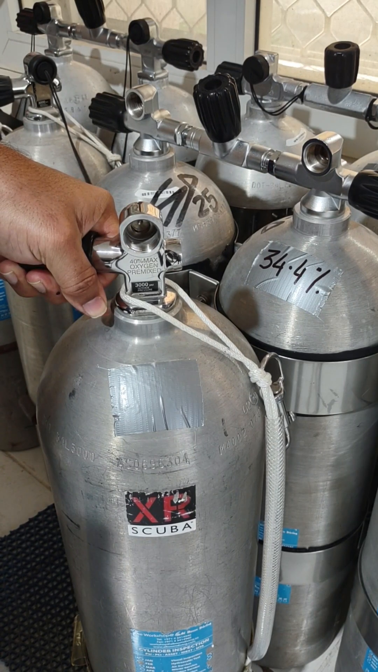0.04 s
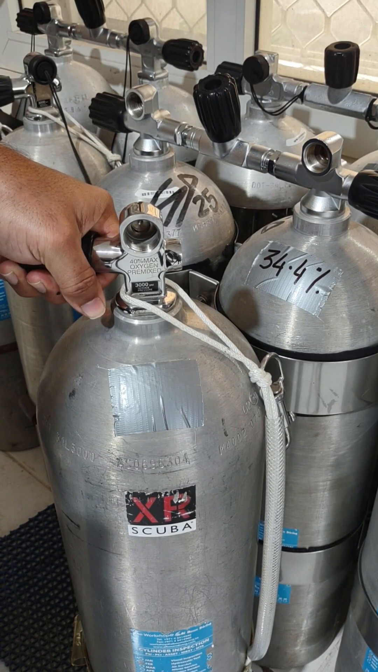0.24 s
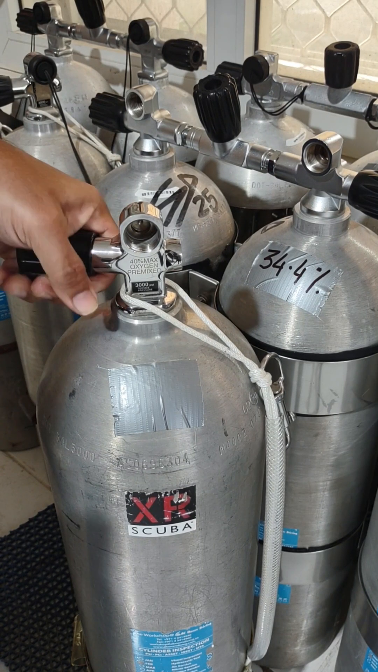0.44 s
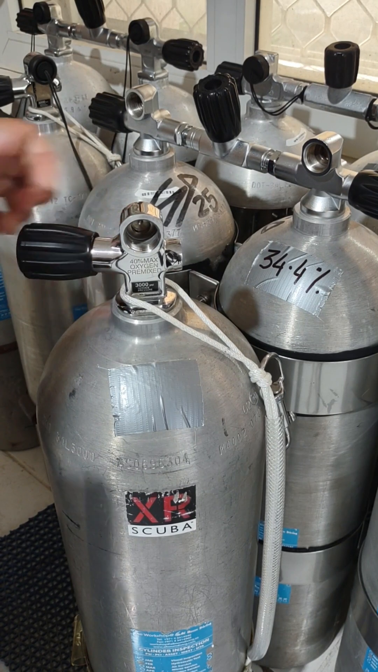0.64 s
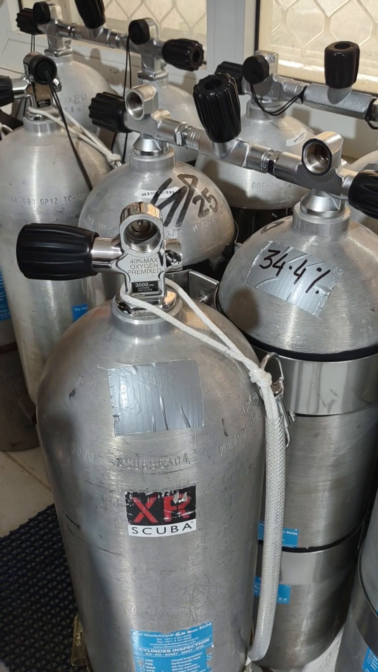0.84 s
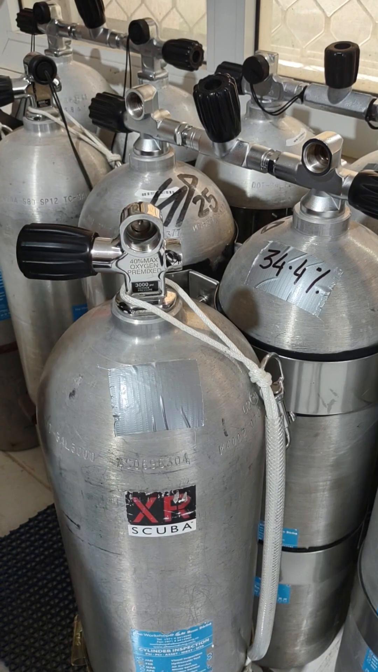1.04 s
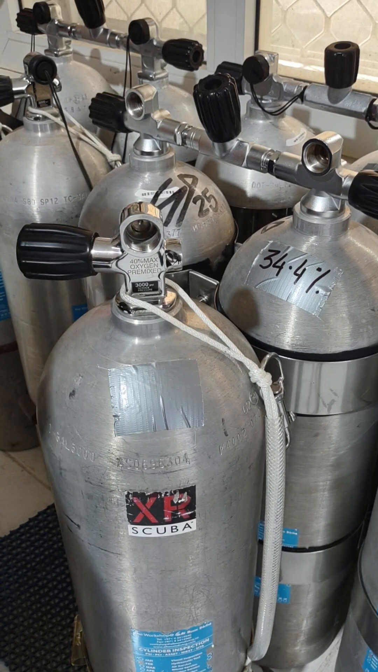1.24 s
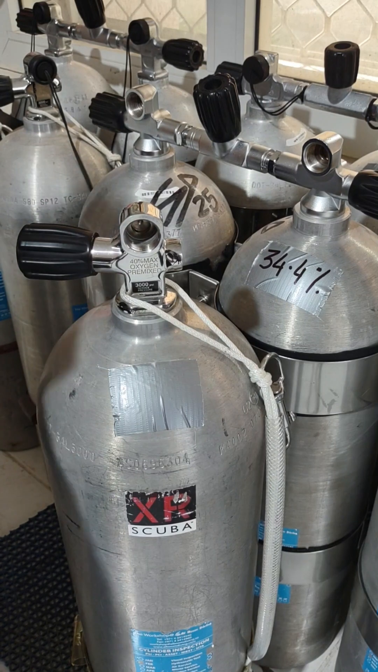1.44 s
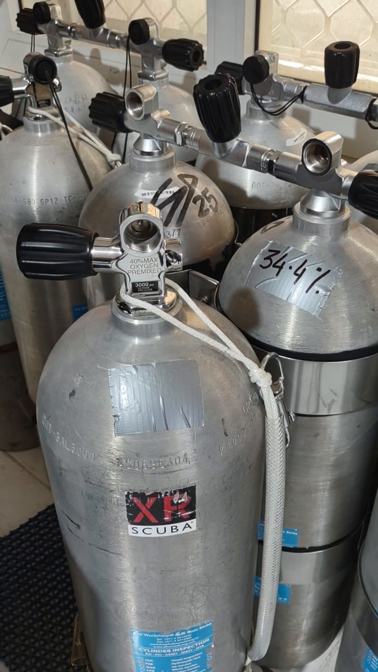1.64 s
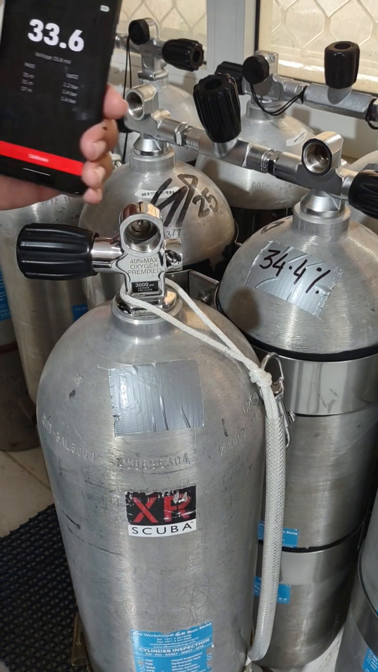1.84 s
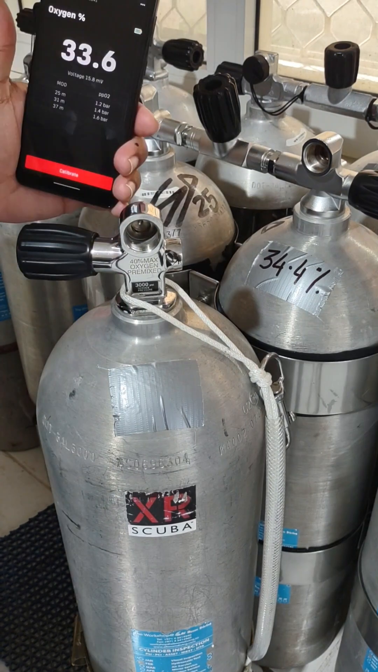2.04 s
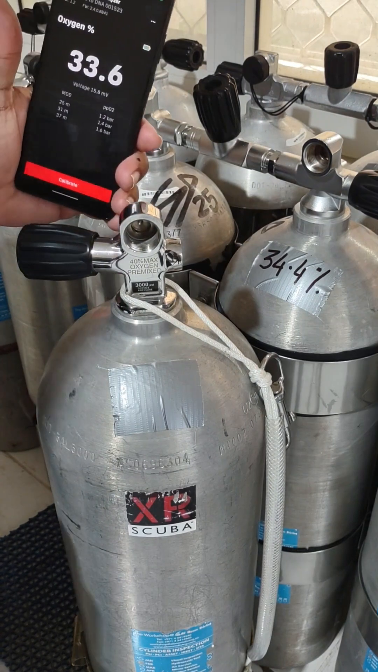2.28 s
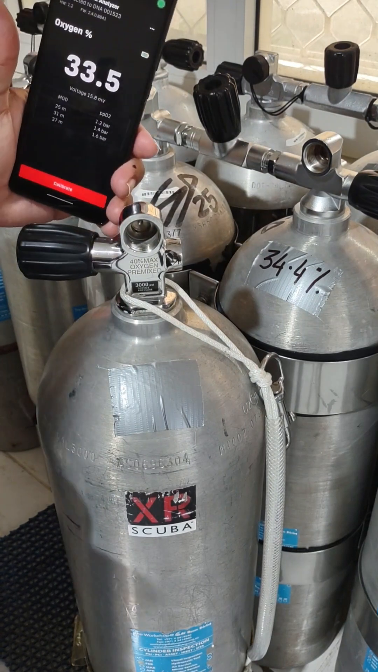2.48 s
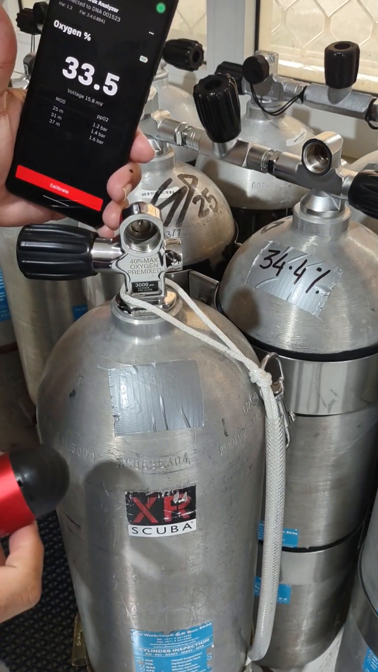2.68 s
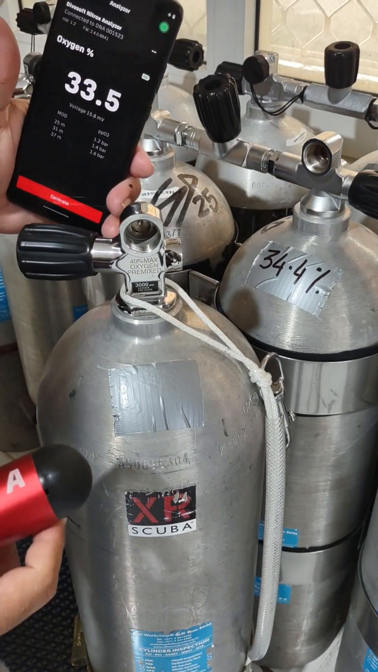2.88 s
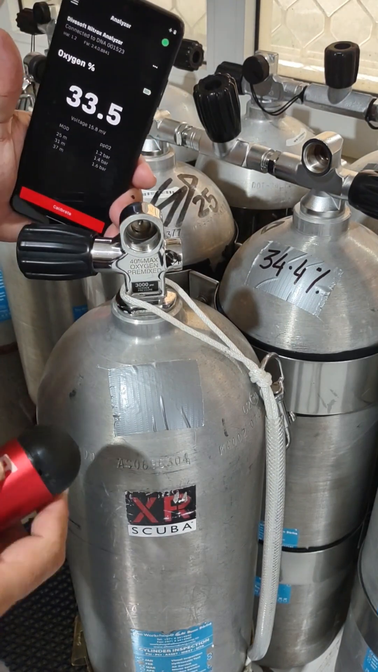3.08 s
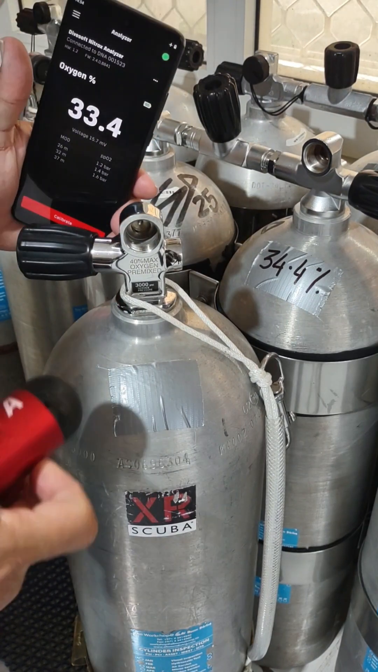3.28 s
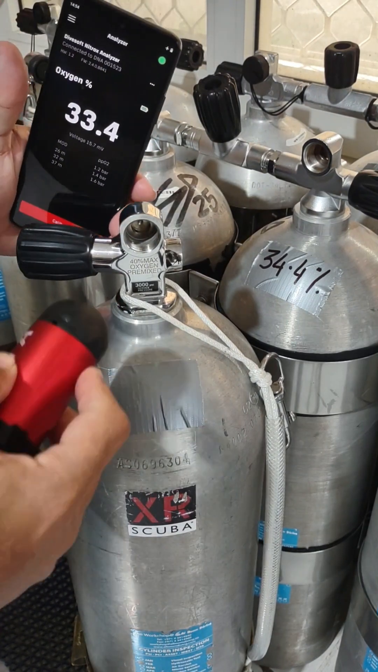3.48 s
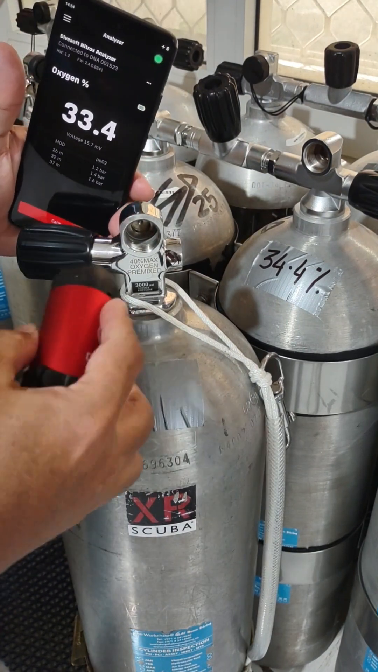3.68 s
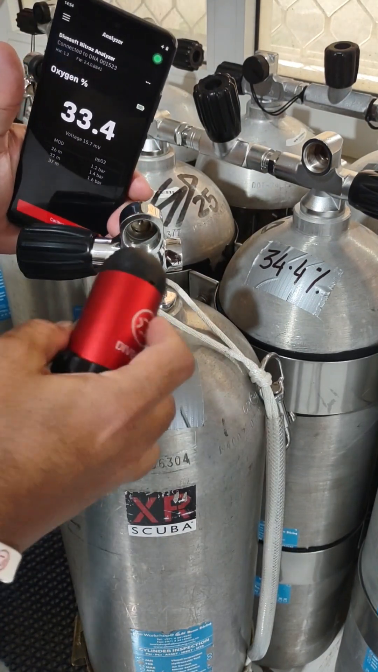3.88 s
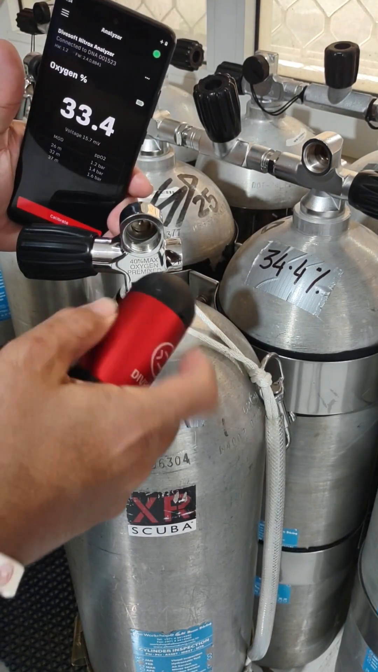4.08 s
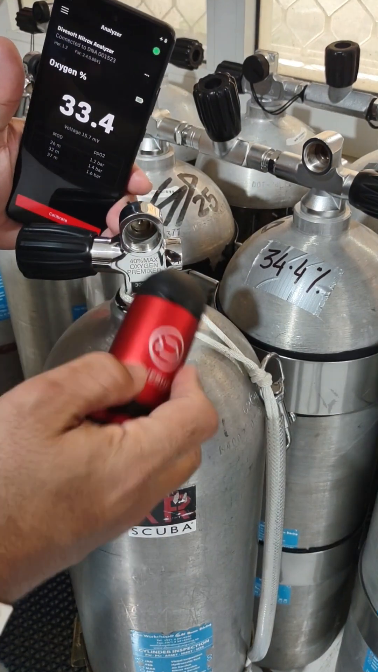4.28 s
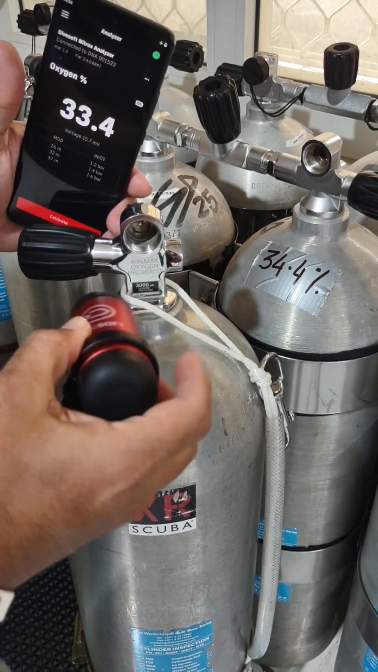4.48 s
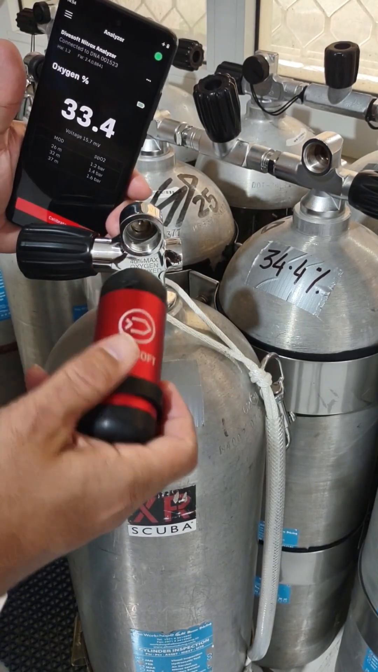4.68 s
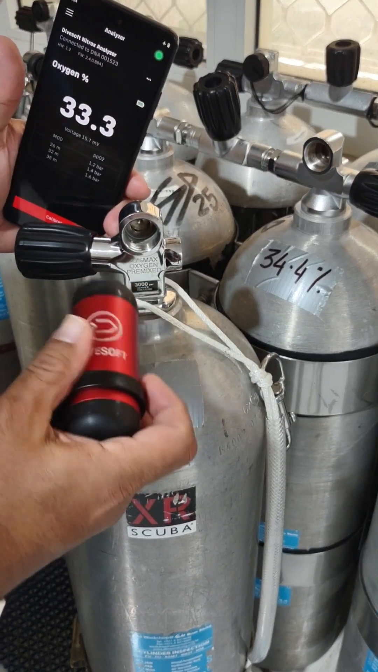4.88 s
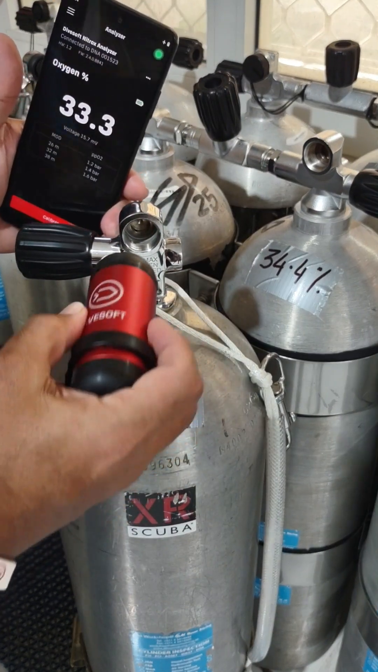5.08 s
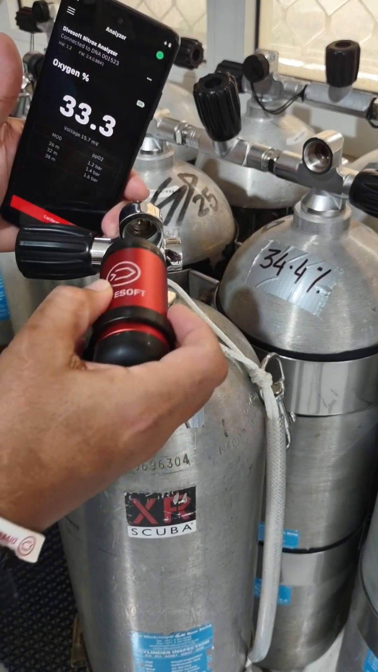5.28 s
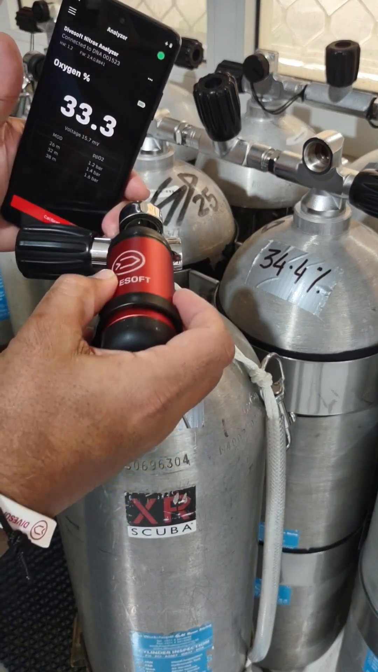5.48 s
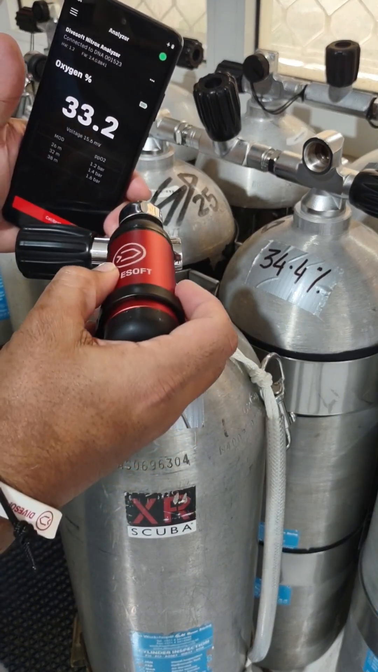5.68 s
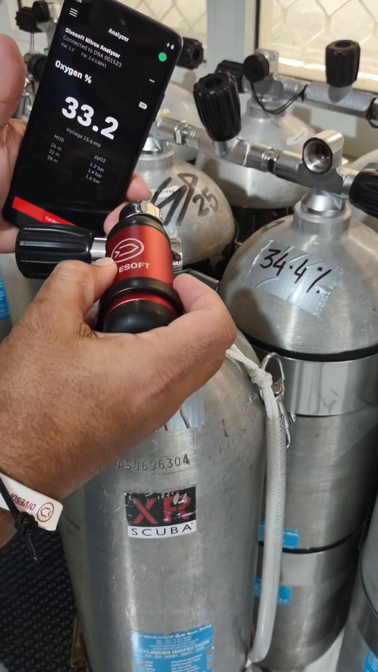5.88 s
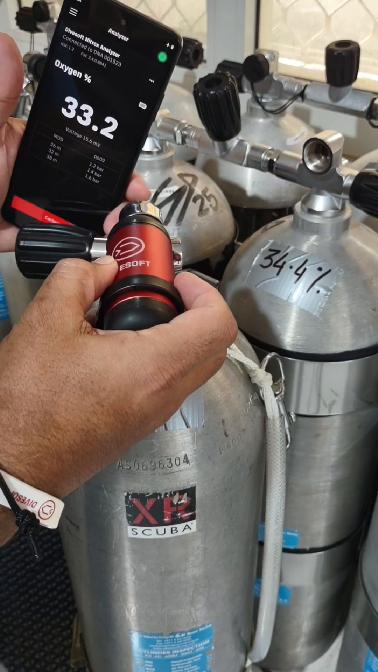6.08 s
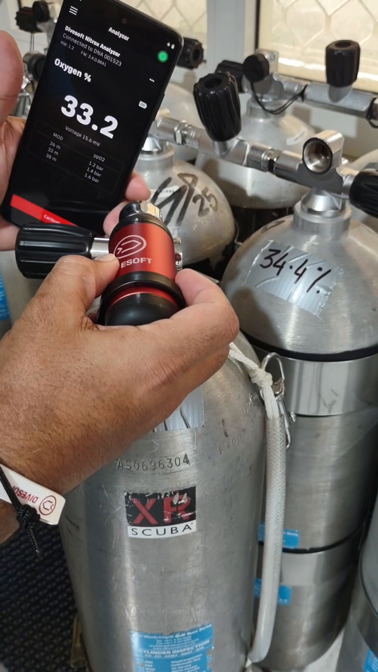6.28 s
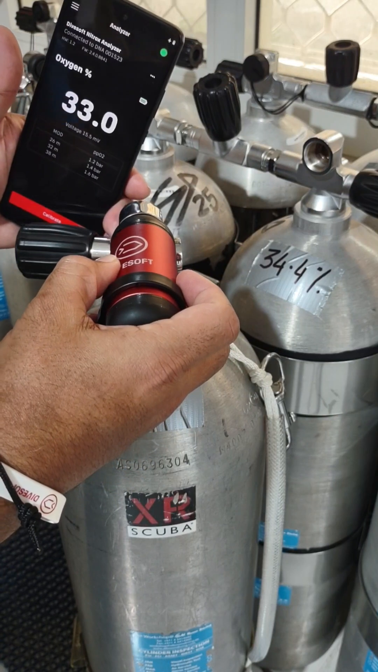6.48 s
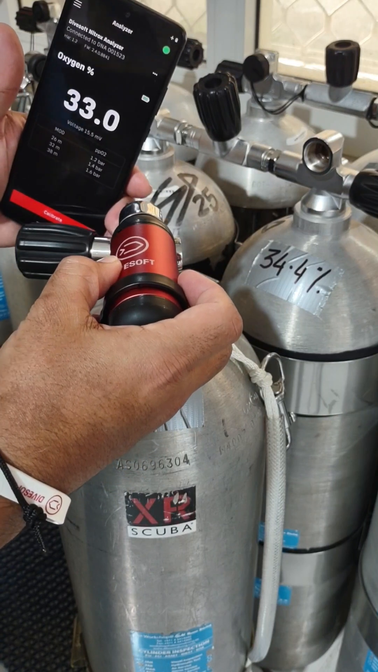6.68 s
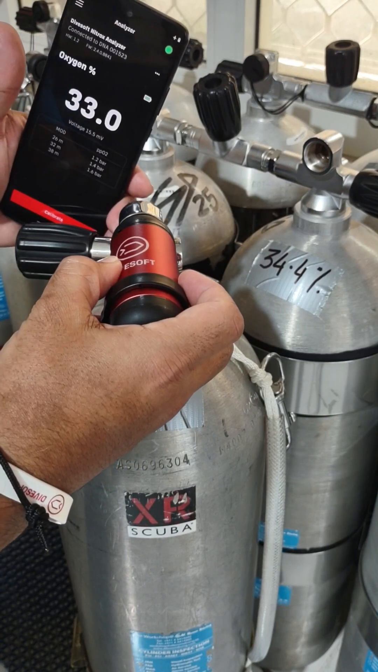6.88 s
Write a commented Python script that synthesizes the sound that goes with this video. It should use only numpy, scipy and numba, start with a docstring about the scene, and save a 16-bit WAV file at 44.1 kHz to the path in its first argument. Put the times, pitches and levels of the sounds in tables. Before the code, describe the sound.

A sharp, airy jet of compressed gas flows for six seconds, darkens and glides downward, then is muffled almost to silence over faint room air.

```python
"""Gas hissing from a cylinder valve, then capped

A jet of gas hisses through a hollow valve mouth: bands of noise, the lowest a gliding resonance of the air.
A hand brings a sensor cap to the mouth: that resonance sinks, the higher bands are shaded, then the cap seals.
Echoes from cylinders, floor and wall ripple the colour. Behind it are dull thuds (dying bursts of low noise),
and a store room's faint air and low hum (steadier noise)."""
import sys
import numpy as np
from scipy import signal
from scipy.fft import rfft, irfft, next_fast_len
from scipy.io import wavfile
from scipy.ndimage import uniform_filter1d
from numba import njit

SR = 44100
rng = np.random.default_rng(int(sys.argv[2]) if len(sys.argv) > 2 else 0)


def to_wav(s):
    """Save 16-bit WAV."""
    ch = np.atleast_2d(s).T  # columns
    pcm = np.round(np.clip(ch, -1, 1) * 32767)  # PCM
    wavfile.write(sys.argv[1], SR, pcm.astype(np.int16))


N = 305610
TIME_S = np.arange(N) / SR

# Colours of the hiss bands above the mouth resonance, and of the low rush, at the two microphone ports.
# Each row: frequency in Hz, left level in dB, right level in dB, extra lead of the right port in radians,
# likeness of the ports (0 to 1). Levels only count against each other. All colour tables work this way.
RUSH_COLOUR = [(538, -6, -14, -.4, 0.54), (755, -11, -12, -1.3, 1), (973, -3.5, 0, -1.5, 1),
               (1320, 8, 0, -0.22, 0.47), (1993, 8, 12.5, -0.92, 0.31), (2560, -25, -11, -.8, 0.42),
               (3200, -36, -29, -0.83, .5)]
SHOULDER_COLOUR = [(3470, -19, -3, 0.14, 1), (3880, -3.5, -11, -0.11, 1), (4180, -1, -10, 0.11, 1),
                   (4610, -5.5, -15, 0.68, 0.27), (4974, -12.5, -16, 1, .6), (5210, -20, -29, 0.58, 0.7),
                   (5700, -39, -39, .9, 0.7)]
MIDDLE_COLOUR = [(5000, -34, -34, 1.0, .95), (5450, -23, -24, .9, .95), (6200, -11, -18, .7, .8),
                 (6600, -4.5, -14, 1.8, .85), (7050, -1.5, -9.5, 3.3, .9), (7700, 0, -15, 4.6, .85),
                 (8000, -6, -18, 5.5, .9), (8400, -22, -30, 6.0, .9)]
DIP_COLOUR = [(7500, -20, -20, 4.3, .85), (7900, -3, -8, 5.2, .9), (8200, 0, -6, 5.8, .9),
              (8600, -2, -6, 6.3, .9), (9100, -4.5, -6, 6.9, .65), (9500, -20, -16, 7.0, .5)]
BRIGHT_COLOUR = [(8700, -36, -28, -2.3, .4), (9200, -19, -19, -2.1, .55), (9500, -6.5, -16.5, -1.6, .9),
                 (9950, 0, -14, -.4, .95), (10300, -3, -15, 1.1, .9), (10550, -7.5, -12, 1.5, .9),
                 (10950, -26, -17, 1.8, .3), (11500, -36, -26, 1.8, .3)]
GAP_COLOUR = [(10600, -22, -14, -1.3, .4), (11050, -4, -1, -1.1, .75), (11600, 0, -1.5, -.5, .85),
              (12400, -1, -4, -.1, .95), (13000, -5.5, -6.5, -.3, .93), (13500, -12, -6, -1.1, .55),
              (14000, -20, -16, -.8, .6)]
TOP_COLOUR = [(12800, -28, -22, -1.0, .5), (13500, -19, -15, -1.0, .55), (13900, -7, -9.5, -.5, .85),
              (14300, 0, -6, .4, .92), (14900, -2.5, -1.5, .7, .95), (15250, -6, -4, .5, .92),
              (15700, -8, -7, -.3, .93), (16200, -9, -8, -.6, .93)]
# Strength of the bands: mouth, rush, shoulder, middle, dip, bright, gap, top.
# Each row: free level in dB, share of the opening, share of the shade, share of the seal, change in dB per second.
BAND_LEVELS = [(-41, 1.27, 0.76, 0.72, -0.29), (-61, 1, 0.27, 0.63, 0), (-44, 1.8, 1, 0.69, 0.5),
               (-38.5, 0.65, 0.93, 0.68, 0), (-48.5, 0.73, 1, 0.93, 0.5), (-35.5, 0.22, 0.87, 1.01, 0.5),
               (-45, 0.55, 0.011, 0.83, -0.28), (-46.5, .3, .1, 0.83, 0)]
# The low rush under the hiss swells and ebbs.
# Each row: time in seconds, change from its free level in dB.
RUSH_SWELL = [(0, 0.5), (1.4, 2), (2.0, -3), (2.6, -2.5), (3.2, 1.5), (3.7, 0.5), (3.95, -3.5), (5.3, -3.5),
              (6.93, -3.5)]
# Hands and sensor moving between valve and microphone shade the hiss.
# Each row: time in seconds, shade in dB (scaled by each band's share).
HAND_SHADE = [(0, -0.5), (.7, -0.5), (.9, -1), (1.2, 0), (1.4, -0.5), (2.4, -0.5), (3.0, -1.5),
              (3.75, -1.5), (3.95, -2.5), (4.1, -2.5), (4.25, -3.5), (4.42, -4), (4.53, -0.5), (4.67, -1.5),
              (4.74, 0), (4.84, -2.5), (4.98, 0), (5.15, -3), (5.4, -4.5)]
# The sensor passes the mouth, then its cap comes down on it.
# Each row: time in seconds, mouth resonance in Hz, leak past the seal in dB (scaled by each band's share).
CAP_PATH = [(0, 3760, 0.5), (2.4, 3754, 0), (3.3, 3690, 0), (3.7, 3600, -0.5), (3.95, 3730, 0),
            (4.4, 3710, 0), (4.95, 3770, -0.5), (5.25, 3760, 0), (5.44, 3530, 0.5), (5.62, 3340, 1),
            (5.81, 3300, 0.5), (5.88, 3110, 2.5), (6.0, 2610, -0.5), (6.28, 2290, 0), (6.46, 2050, -4.5),
            (6.55, 1800, -11.5), (6.585, 1910, -25), (6.65, 2030, -29), (6.93, 2200, -38)]
# What the cap adds to each band (or takes, below zero) as it lowers the resonance.
# Each row: resonance in Hz, then dB for mouth, rush, shoulder, middle, dip, bright, gap and top,
# then dB added on the left and taken from the right.
CAP_EFFECT = [(2020, 2, 13.5, -40, -26, -15, -8.5, -25, -5.5, 0.5),
              (2300, -2, 9.5, -25, -20.5, -11, -8.5, -16, -3, 1.5),
              (2650, -1, 10, -18.5, -17, -8, -4.5, -9, -1, 0.5),
              (3110, 3, 7, -17.5, -7, -10, -6, -7, -4, 1.5),
              (3465, -1, 2, -6.5, 1, -11, -2.5, -2, -3.5, 0.5),
              (3627, 0, -0.5, -0.5, 0, 1, -0.5, 0, 0, 0.5)]
OPENING_S, OPENING_DB = 0.29, -4.5   # time to full flow; shortfall at the start, scaled by each band's share
LEFT_SHADE_SHARE = 0.42              # the shade tilts the image away from the left
MOUTH_WIDTH_HZ, WIDENS_HZ_PER_DB = 516, 38   # shading broadens the resonance
NARROW_BELOW_HZ = 3450               # under the cap the resonance keeps its own width


def jet(flutter_db, own_db):
    """Turbulent gas makes fluttering bands of noise; opening, shade, cap and seal set their levels."""
    opening_db = OPENING_DB * np.clip(1 - TIME_S / OPENING_S, 0, 1)
    shade_db, = in_time(HAND_SHADE)
    centre_hz, seal_db = in_time(CAP_PATH)
    pitch_hz, *columns = np.transpose(CAP_EFFECT)
    *cap_db, tilt_db = [np.interp(centre_hz, pitch_hz, column) for column in columns]
    tilt_db = tilt_db + LEFT_SHADE_SHARE * shade_db

    uncovered = centre_hz > NARROW_BELOW_HZ
    width_hz = MOUTH_WIDTH_HZ - WIDENS_HZ_PER_DB * shade_db * uncovered
    rush = port_noise(RUSH_COLOUR) * from_db(in_time(RUSH_SWELL)[0])
    noises = [mouth(centre_hz, width_hz, skirt_db=-7.5), rush]
    for colour in (SHOULDER_COLOUR, MIDDLE_COLOUR, DIP_COLOUR, BRIGHT_COLOUR, GAP_COLOUR, TOP_COLOUR):
        noises.append(port_noise(colour))

    together_db = flutter_db * drift(42)   # flutter shared by all bands
    hiss = 0
    for noise, effect_db, (free_db, opening, shade, seal, slope) in zip(noises, cap_db, BAND_LEVELS):
        level_db = free_db + slope * TIME_S + effect_db
        level_db = level_db + opening * opening_db + shade * shade_db + seal * seal_db
        own_flutter_db = own_db * drift(19.3)
        hiss = hiss + noise * from_db(level_db + together_db + own_flutter_db)
    return hiss * from_db([tilt_db, -tilt_db])


# Colour of the noise that drives the mouth resonance.
# Each row: frequency in Hz, left dB, right dB, extra lead of the right port in radians, likeness (0 to 1).
MOUTH_COLOUR = [(1210, -15, 4.5, -0.96, 0.6), (2080, 0, -8, -2.35, 0.2), (2930, 9.5, 2.5, -0.26, 0.87),
                (3540, 0.5, -6, -0.66, 0.85), (4040, -3, -24, 0.04, 0.79), (6000, -16, -18, .3, 0.24)]


def mouth(centre_hz, width_hz, skirt_db):
    """The lowest air resonance of the valve mouth: a sharp top on a broad skirt."""
    r = np.exp(-np.pi * np.clip(width_hz, 100, 3000) / SR)   # a wider resonance rings for less time
    bend = 2 * r * np.cos(2 * np.pi * centre_hz / SR)
    once = np.array([gliding(port, r, bend) for port in port_noise(MOUTH_COLOUR)])
    twice = np.array([gliding(port, r, bend) for port in once])
    both = twice + from_db(skirt_db) * once
    power = uniform_filter1d(both.mean(axis=0) ** 2, SR // 4)
    return both / np.sqrt(power)   # the level stays even as the pitch glides


@njit
def gliding(x, r, bend):
    """A resonance whose centre and width change sample by sample; gain 1 on top."""
    y = np.zeros_like(x)
    for i in range(2, len(x)):
        driven = (1 - r[i] ** 2) / 2 * (x[i] - x[i - 2])
        y[i] = driven + bend[i] * y[i - 1] - r[i] ** 2 * y[i - 2]
    return y


def neighbours(x, echo_db, t60, first_s, moved, dull_hz):
    """Echoes from cylinders, floor and wall differ at each port and change as the hand-held microphone wanders."""
    t = np.arange(SR // 12) / SR
    # two sets of echoes for two ports: random taps that die away
    echoes = rng.standard_normal((2, 2, len(t))) * from_db(-60 * t / t60) * (t > first_s)
    echoes *= from_db(echo_db) / np.sqrt(np.sum(echoes ** 2, axis=2, keepdims=True))
    # round metal and rubber mat scatter the treble
    echoes = signal.lfilter(*signal.butter(1, dull_hz, fs=SR), echoes)
    here, there = signal.fftconvolve(x[None], echoes, axes=2)[:, :, :N]
    turn = np.linspace(0, moved, N)   # angle in radians: one set slowly turns into the other
    return x + np.cos(turn) * here + np.sin(turn) * there


# Dull thuds somewhere in the room.
# Each row: start in seconds, body level in dB, level of the knock on top in dB,
# both before the crest allowance is taken off and the impact is added.
THUD_TIMES = [(0.729, -61, -63), (0.839, -65, -67), (0.999, -68, -69), (1.179, -56, -59), (1.449, -70, -59),
              (3.679, -68, -63.5), (3.926, -60.5, -67), (4.229, -62, -70), (5.619, -66, -64),
              (5.975, -66.5, -78), (6.72, -60, -58), (6.849, -75, -64)]
# Colours of the thud's body and of its knock.
# Each row: frequency in Hz, left dB, right dB, extra lead of the right port in radians, likeness (0 to 1).
BODY_COLOUR = [(110, -24, -12, 0, .7), (200, -17, -9, 0, 0.82), (263, 3, -0.5, 0, 0.81),
               (332, -7, -1.5, 0, 0.99), (427, -11.5, -12.5, 0, 0.43), (638, -8.5, -12, 0, 1)]
KNOCK_ON_TOP_COLOUR = [(445, -20, -8, 0, 0.55), (820, 3, 4, 0, 0.7), (990, 0, 1, 0, 0.76),
                       (1300, -13, -12, 0, .6), (2500, -23, -22, 0, .5)]
BODY_T60_S, KNOCK_T60_S = 1.59, 0.97     # time to fall by 60 dB
IMPACT_DB, IMPACT_T60_S = 0.5, 0.095     # short burst added at each start, against the body or knock


def thuds(crest_db):
    """Low noise that sets in at once and dies with the room; crest_db allows for peaks above the rms."""
    body = knock = 0
    for start_s, body_db, knock_db in THUD_TIMES:
        since = (TIME_S - start_s).clip(0)
        started = TIME_S > start_s
        impact = from_db(IMPACT_DB - 60 * since / IMPACT_T60_S)
        body_fade = from_db(-60 * since / BODY_T60_S) + impact
        knock_fade = from_db(-60 * since / KNOCK_T60_S) + impact
        body = body + from_db(body_db - crest_db) * body_fade * started
        knock = knock + from_db(knock_db - crest_db) * knock_fade * started
    return body * port_noise(BODY_COLOUR, lag_s=0) + knock * port_noise(KNOCK_ON_TOP_COLOUR, lag_s=0)


# The level of the room's low hum.
# Each row: time in seconds, level in dB before a slight waver.
HUM_LEVEL = [(0, -81), (1.2, -79.5), (1.9, -83), (3.6, -78), (4.4, -82.5), (5.9, -76), (6.93, -81)]
# Colour of the hum.
# Each row: frequency in Hz, left dB, right dB, extra lead of the right port in radians, likeness (0 to 1).
LOW_HUM_COLOUR = [(20, -22, -17, 0, .9), (45, -5, -15, 0, 0.99), (65, -13, -7.5, 0, 0.69),
                  (80.4, -1, 0, 0, 0.61), (102, -14.5, -10, 0, 0.98), (136.6, -13, -13.5, 0, 0.61)]


def hum():
    """A low hum made of narrow deep noise that swells, ebbs and wavers."""
    level_db = in_time(HUM_LEVEL)[0] + 0.8 * drift(2.5)
    return from_db(level_db) * port_noise(LOW_HUM_COLOUR, lag_s=0)


# Colour of the room's air.
# Each row: frequency in Hz, left dB, right dB, extra lead of the right port in radians, likeness (0 to 1).
ROOM_COLOUR = [(98, -6, -23, 0, 0.45), (140, -7, -7.5, 0, .45), (274, -10, -9.5, 0, 0.47),
               (630, -15.5, -14.5, 0, 0.33), (884, -4, -5.5, 0.0095, 0.88), (2200, -3.5, -13.5, 0, 0.4),
               (4760, -13.5, -15, 0.0043, 0.23), (10100, -17, -26, 0, 0.34), (13300, -34, -28, 0, 0.26),
               (14800, -24, -22, 0, .3), (16000, -20, -18, 0, .3)]


def room_air():
    """The room's air as faint broad noise, nearly steady, around -66.5 dB before the echoes."""
    return from_db(-66.5 + 0.51 * drift(2.6)) * port_noise(ROOM_COLOUR, lag_s=0)


def port_noise(colour, lag_s=7 / SR):
    """Noise as two ports hear it: own colour each, a direct part in common, a diffuse part of their own."""
    size = next_fast_len(N)
    hz = np.arange(1, size // 2 + 2) * SR / size
    table = np.array(colour)
    columns = [np.interp(np.log(hz), np.log(table[:, 0]), column) for column in table.T[1:]]
    left_db, right_db, lead, alike = columns
    alike = np.clip(alike, 0, 1)
    common, own_left, own_right = rfft(rng.standard_normal((3, size)))
    inside = (hz > table[0, 0]) & (hz < table[-1, 0])   # silent outside the table
    # with a lag the left port hears it later: the right port is nearer to the valve
    early = np.exp(1j * (2 * np.pi * hz * lag_s + lead))
    direct, diffuse = np.sqrt(alike), np.sqrt(1 - alike)
    left = from_db(left_db) * (direct * common + diffuse * own_left)
    right = from_db(right_db) * (direct * common * early + diffuse * own_right)
    return rms_one(irfft(np.array([left, right]) * inside, size)[:, :N])


def drift(rate):
    """Slow chance: noise smoothed by two equal low-passes with their corner at rate in Hz; rms 1."""
    r = np.exp(-80 * np.pi * rate / SR)   # one step every 40 samples
    noise = rng.standard_normal(N // 40 + 2002)
    slow = signal.lfilter([1], [1, -2 * r, r * r], noise)[2000:]   # skip the filter's run-in
    return np.interp(np.arange(N) / 40, np.arange(len(slow)), rms_one(slow))


def in_time(rows):
    """Columns of a curve table, drawn with straight lines sample by sample."""
    s, *columns = np.transpose(rows)
    return [np.interp(TIME_S, s, column) for column in columns]


def from_db(db):
    """Decibels to gain."""
    return 10 ** (np.asarray(db) / 20)


def rms_one(x):
    """Scales so that the mean of the channels has rms 1."""
    return x / np.sqrt(np.mean(np.mean(np.atleast_2d(x), axis=0) ** 2))


def scene():
    """Jet, thuds and room air with echoes from close by, and the hum without them."""
    near = jet(flutter_db=0.5, own_db=0.67) + thuds(crest_db=11.0) + room_air()
    echoed = neighbours(near, echo_db=-9.0, t60=0.073, first_s=0.0027, moved=1.62, dull_hz=12000)
    return echoed + hum()


def record(dry):
    """A steep low-pass cuts the top above 15720 Hz."""
    return signal.sosfilt(signal.ellip(12, .3, 70, 15720, fs=SR, output="sos"), dry)


dry = scene()
out = record(dry)
to_wav(out)
```